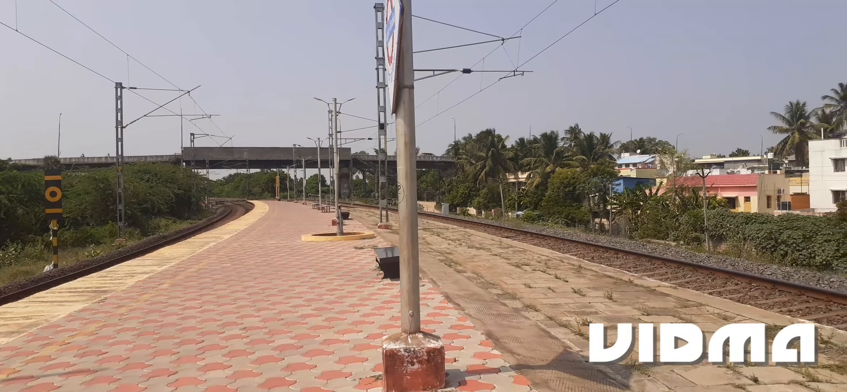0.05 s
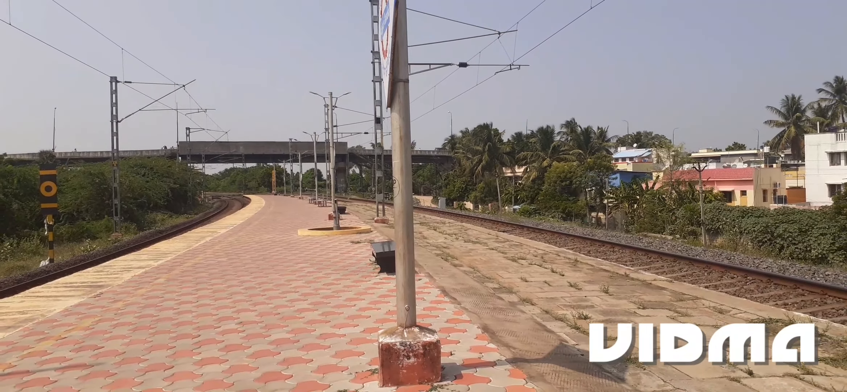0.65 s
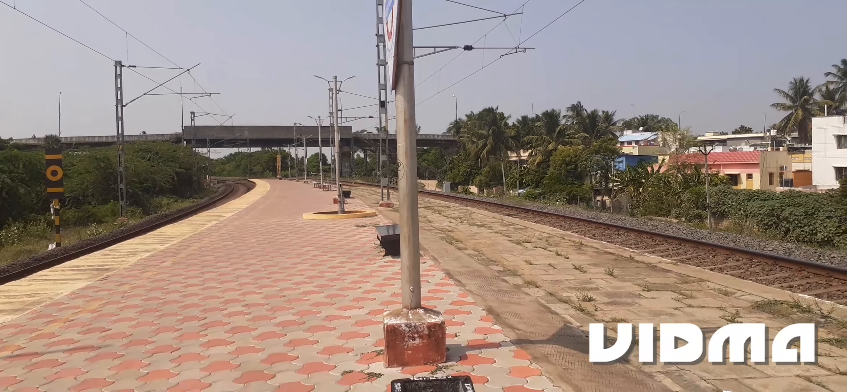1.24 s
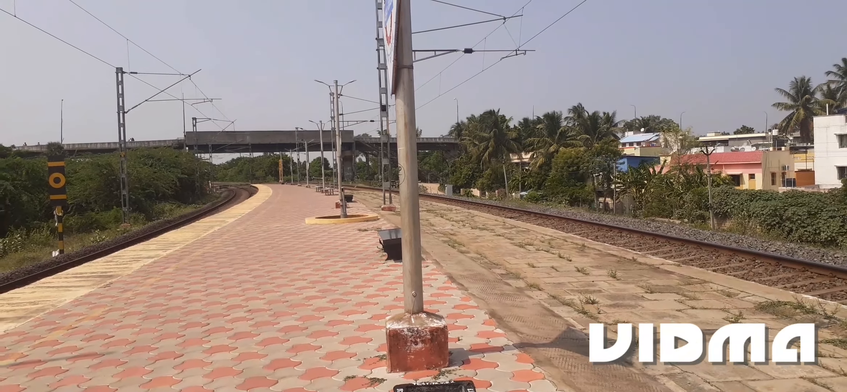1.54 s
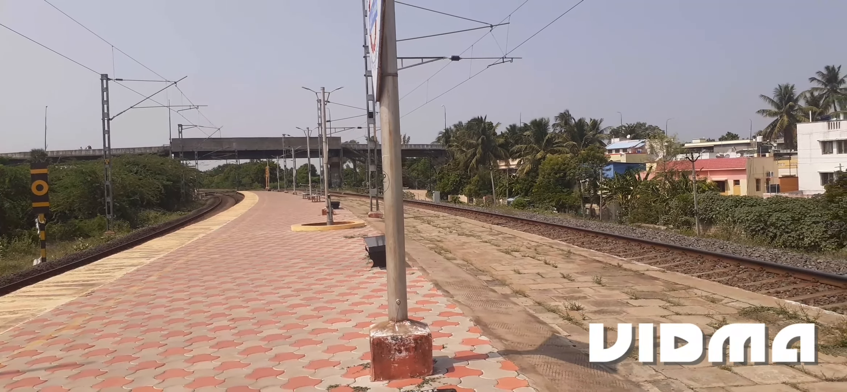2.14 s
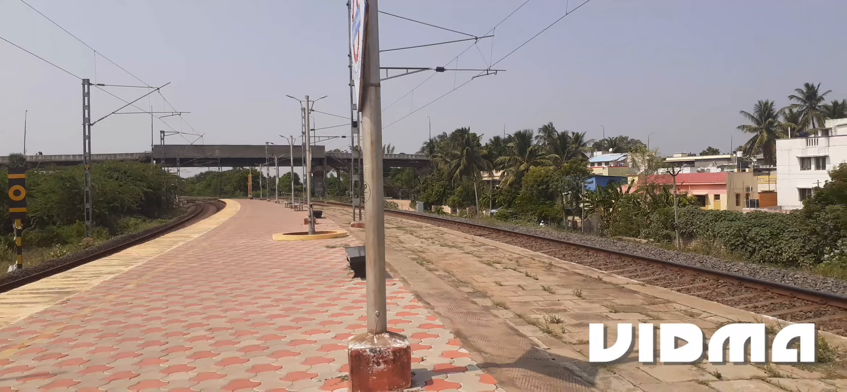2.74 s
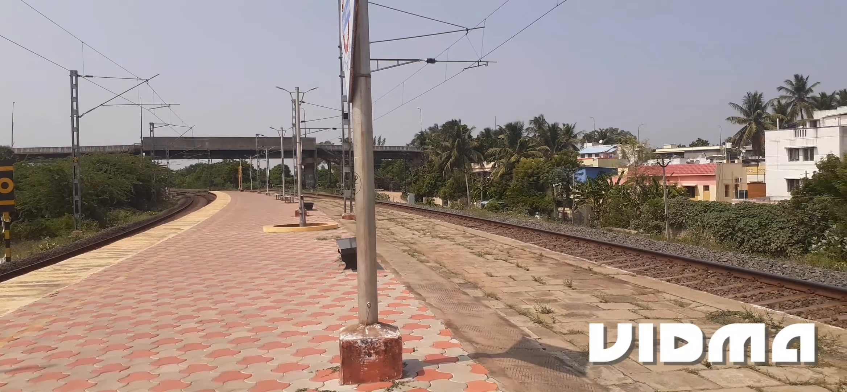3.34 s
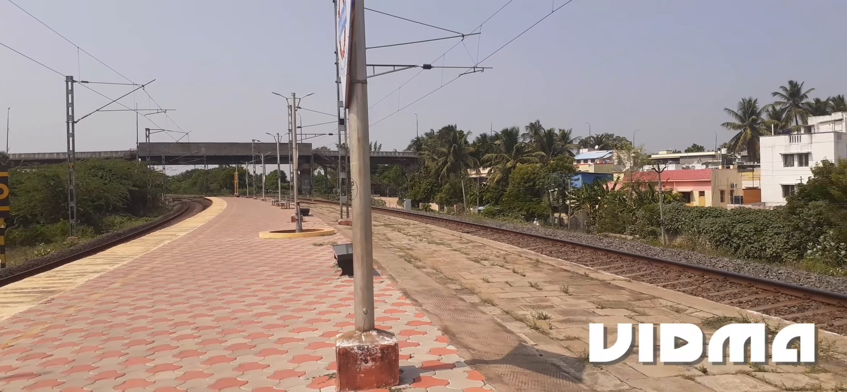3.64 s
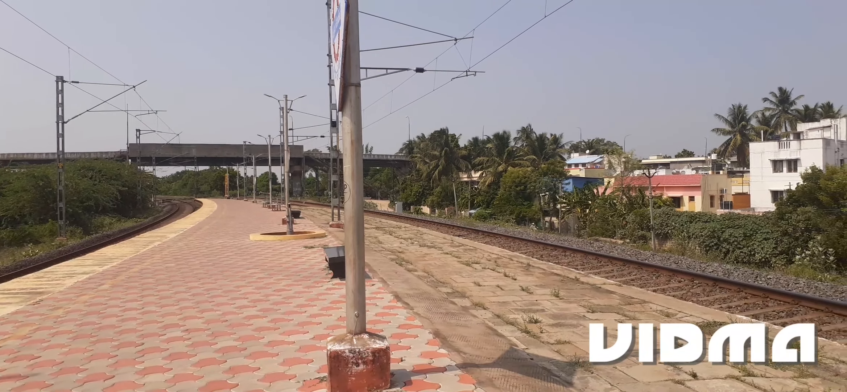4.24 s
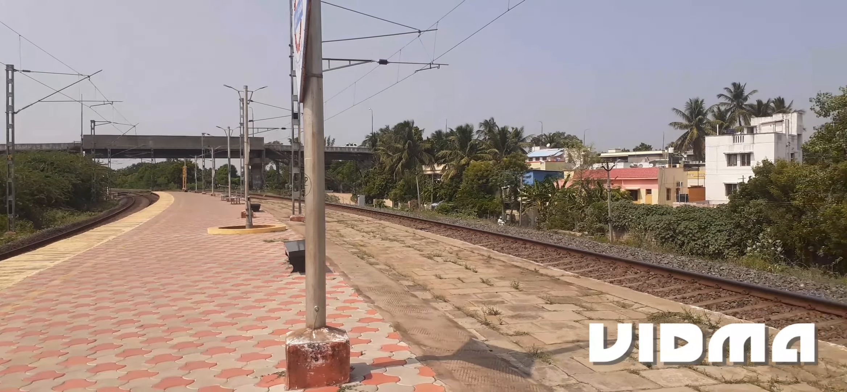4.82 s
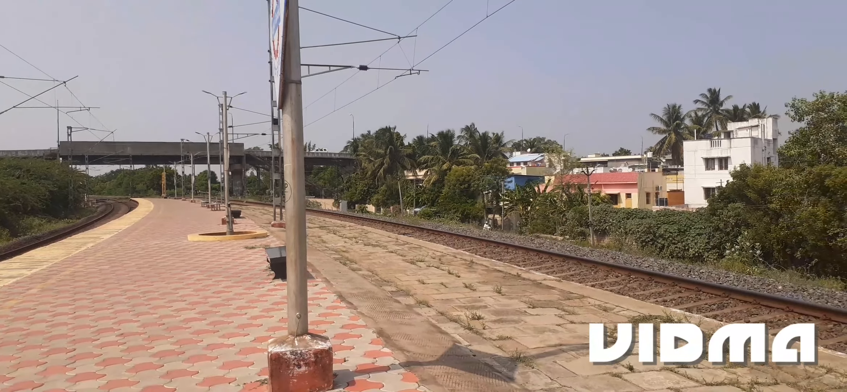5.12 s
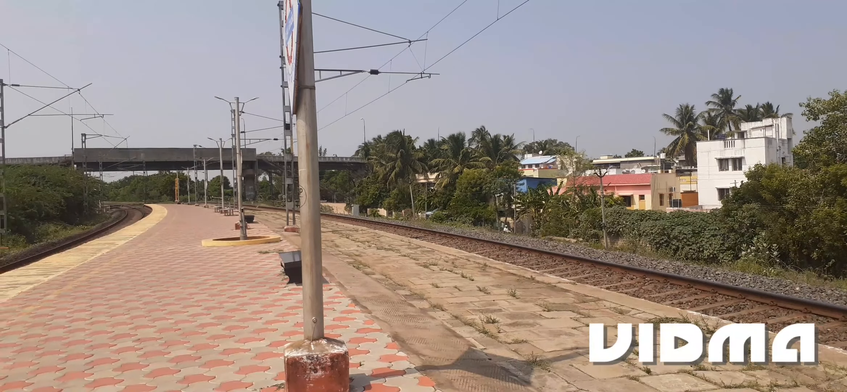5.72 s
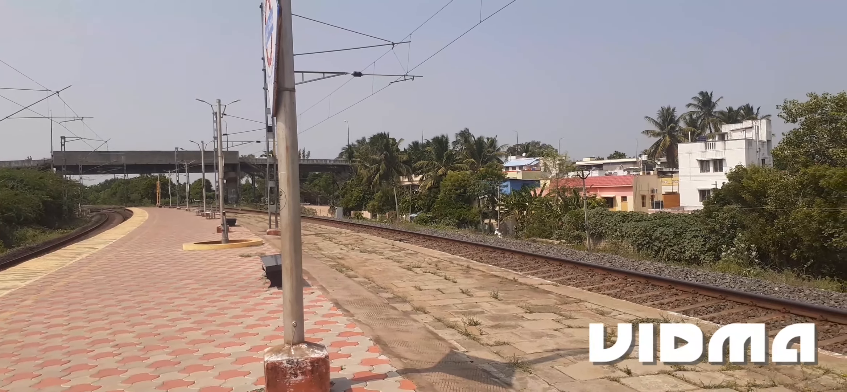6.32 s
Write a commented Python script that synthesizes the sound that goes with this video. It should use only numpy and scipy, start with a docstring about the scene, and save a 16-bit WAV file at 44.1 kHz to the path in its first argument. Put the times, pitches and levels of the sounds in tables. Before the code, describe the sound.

A far-off approaching train blows its air horn twice, each blast a little over a second long, wavering in the gusty air and echoing across an open platform. Between them comes a faint high whistle, while the train rolls and whines quietly. Wind thumps the microphone on the left and crackles on the right at first, eases, then buffets both sides during the second blast.

```python
"""Wind thumps the left microphone port and crackles on the right, on an open station platform.
A distant train sounds its air horn twice; gusty air makes the reed's partials fade in and out,
and a bridge, houses and trees throw the sound back. The train whines and the rails sing faintly
ahead of it. Far off, a hoot comes before the first blast, a whistle and one bird chirp after it.
Toward the end the wind turns and buffets both ports."""
import sys
import numpy as np
from scipy import signal
from scipy.fft import rfft, irfft, next_fast_len
from scipy.io import wavfile
from scipy.ndimage import map_coordinates

SR = 44100
rng = np.random.default_rng(int(sys.argv[2]) if len(sys.argv) > 2 else 0)


def to_wav(sig):
    """Store sig (one row per channel, or 1-D mono) as 16-bit WAV at the path in sys.argv[1].

    Samples outside -1..1 are clipped; the rate is SR.
    """
    pcm = np.clip(np.atleast_2d(sig), -1, 1) * 32767
    pcm = np.round(pcm).astype(np.int16)
    wavfile.write(sys.argv[1], SR, pcm.T)  # frames by channels


N = 280917
TIME = np.arange(N) / SR

# horn blasts: (start [s], valve closes [s], settled pitch [Hz], left port lead [ms], twinkle rate [1/s])
HORN_BLASTS = [(1.543, 2.762, 414.1, .17, 17.88), (5.199, 6.45, 413.2, 0.22, 16.95)]
# lowest two partials fading over the distance, per blast: (time [s], fundamental [dB], octave [dB])
LOW_FADES = [
    [(1.59, -35, -19.5), (2.022, -42, -28.5), (2.1, -38, -22.5), (2.284, -36.5, -22.5),
     (2.384, -42.5, -25.5), (2.592, -44.5, -26), (2.642, -69, -40.5), (2.678, -39, -30), (2.76, -38, -28.5)],
    [(5.26, -34, -21.5), (5.308, -40.5, -19), (5.372, -32.5, -21.5), (5.482, -31.5, -27), (5.73, -28, -26),
     (5.926, -28, -26), (6.102, -28, -29.5), (6.224, -29, -50), (6.294, -31, -33.5), (6.36, -31, -39.5)],
]
# the third partial, per blast: (time [s], level [dB])
THIRD_PARTIAL_FADES = [
    [(1.6, -27.5), (1.95, -29), (2.08, -31.5), (2.28, -30.5), (2.48, -38), (2.68, -29.5), (2.75, -36.5)],
    [(5.33, -30.5), (5.68, -30), (5.78, -41), (5.85, -35.5), (5.97, -42.5), (6.1, -33), (6.22, -29.5),
     (6.36, -33)],
]
# the fourth partial, then all higher ones together, per blast: (level [dB], drift [dB/s])
UPPER_LEVELS = [
    [(-37, -6.5), (-36, -2.5)],
    [(-35, 3.5), (-37, 1.5)],
]
# share of each higher partial in the first and second blast: (frequency [Hz], gain [dB])
FIRST_BRASS = [(2060, -5), (2480, -7.5), (2890, -12), (3300, -14.5), (3720, -16), (4540, -21), (5370, -23),
               (6200, -26), (6610, -35), (7850, -48), (11150, -69)]
SECOND_BRASS = [(2060, -3.5), (2480, -3), (2890, -12.5), (3300, -15.5), (3720, -9.5), (4540, -18.5),
                (4950, -19), (5370, -19.5), (5780, -20), (6200, -20), (6610, -27.5), (7850, -29.5),
                (9090, -42.5), (11150, -47)]
# the air briefly focuses or thins some overtones: (time [s], centre [Hz], half length [s], gain [dB])
AIR_SWELLS = [(1.641, 2440, 0.014, 14.5), (1.623, 4150, 0.029, 13.5), (2.03, 2070, 0.025, 9),
              (2.18, 2330, 0.11, 17.5), (5.399, 4490, 0.043, 21), (5.431, 1660, 0.032, -20.5),
              (5.943, 3028, 0.09, 22), (5.996, 4720, 0.16, 17), (6.305, 4200, 0.1, 7),
              (2.3, 3700, 0.046, 12), (2.367, 2070, 0.023, -15), (2.58, 2320, 0.043, -11),
              (5.665, 3720, 0.071, 7), (5.63, 7940, 0.067, 10), (6.135, 2070, 0.054, 8.5),
              (6.33, 2070, .07, -19)]
# the horn across the two ports: (frequency [Hz], left minus right [dB])
HORN_BALANCE = [(413, -.5), (826, -2), (1240, -6), (1650, -6.5), (2070, -12), (2900, -0.5), (11000, -13)]
# what bridge, houses and trees throw back: (frequency [Hz], gain [dB])
ECHO_SPECTRUM = [(410, 4), (820, -0.5), (1240, -3), (1650, 2), (2070, 6), (2480, 4.5), (3500, 2.5),
                 (6000, 6.5), (11000, -18.5)]
# partials of the weak lower horn: (frequency [Hz], gain [dB])
LOW_HORN_PARTIALS = [(718, 3), (1077, -0.5), (1436, -12.5), (2240, -22)]

# low buffeting at each port, as the wind turns from left to right: (time [s], level [dB])
LEFT_BUFFETING = [(0, -39), (.45, -42), (.68, -37), (.73, -45.5), (1.55, -46), (1.66, -57.5), (2.45, -59),
                  (2.55, -54), (3.3, -51.5), (3.8, -62), (4.12, -51), (4.35, -48), (4.42, -72), (5.2, -69),
                  (5.28, -49), (5.5, -44.5), (5.8, -38.5), (6.05, -47), (6.37, -44)]
RIGHT_BUFFETING = [(0, -67), (.75, -79), (2.3, -70), (3.099, -55), (3.25, -68), (3.42, -52.5),
                   (3.65, -48.5), (4.0, -52), (4.15, -44.5), (4.55, -43), (5.181, -52), (5.27, -42),
                   (5.8, -41), (6.05, -47.5), (6.37, -42.5)]
# crackly flutter at each port: (time [s], level [dB])
LEFT_FLUTTER = [(0, -58), (.8, -71.5), (4.2, -62.5), (4.3, -60), (4.42, -59), (5.15, -56.5), (5.25, -46),
                (5.7, -43.5), (5.95, -68), (6.37, -46)]
RIGHT_FLUTTER = [(0, -41), (.07, -46.5), (.14, -47.5), (.2, -43), (.27, -46), (.38, -43.5), (.64, -44.5),
                 (.72, -54), (.79, -52), (.82, -69), (1.21, -57), (1.25, -40), (1.3, -51), (1.33, -73),
                 (1.54, -51), (1.64, -37.5), (1.9, -50.5), (2.18, -41), (2.35, -61.5), (2.6, -45),
                 (2.68, -62), (3.15, -71), (3.23, -42), (3.31, -64), (5.2, -58.5), (5.769, -54.5),
                 (6.37, -59)]
# the strongest gust, churning at both ports: (time [s], level [dB])
GUST_LEVEL = [(5.1, -86), (5.25, -57), (5.5, -52.5), (5.7, -53), (5.78, -45), (5.85, -44.5), (6.05, -53.5),
              (6.37, -51.5)]
# spectra of the wind on the microphone: (frequency [Hz], density [dB])
BUFFET_SPECTRUM = [(15, -29), (30, -9), (55, 0), (85, 1), (140, -3), (240, -11), (400, -27.5), (900, -62.5)]
FLUTTER_SPECTRUM = [(90, -29), (230, -22.5), (300, 2), (380, 7.5), (540, -2.5), (850, -11.5), (1500, -25),
                    (3000, -43.5), (7000, -57)]
GUST_SPECTRUM = [(100, -27), (190, -5), (260, 1.5), (340, -0.5), (500, -21), (1000, -53.5)]
PUFF_SPECTRUM = [(120, -24), (230, -8), (320, 5), (480, 7.5), (800, -9.5), (1400, -13.5), (2500, -24.5),
                 (7000, -63)]
# big eddies that thump the ports: (time [s], level [dB], left minus right [dB], pitch [Hz])
BIG_EDDIES = [(.076, -28, 30, 111), (.234, -34, 23, 140), (.32, -27, 24, 130), (0.382, -22.5, 29, 100),
              (.436, -30, 25, 90), (.502, -28, 22, 190), (.512, -23, 8, 138), (0.581, -27.5, 22, 162),
              (.64, -28, 24, 135), (.96, -38, -9, 110), (1.014, -40, 28, 135), (1.123, -43.5, -6, 170),
              (1.258, -35, 20, 148), (1.435, -37, 2, 153), (1.532, -32, 26, 138), (2.586, -33.5, 20, 119),
              (3.729, -25.5, 6, 59.6), (3.902, -24, -2, 84), (4.148, -24, -3, 65), (4.227, -30, 0, 90),
              (4.316, -33.5, 19, 150), (4.83, -30, 1, 80.6), (5.243, -33.5, -12, 140),
              (5.474, -30, -1, 120), (5.529, -33, 7, 129), (5.611, -35, 4, 186), (5.73, -30.5, 3, 180),
              (5.776, -25.5, 2, 248), (5.926, -26, 0, 108), (6.186, -34, 6, 115), (6.274, -22.5, 5, 80)]
# small eddies that flick a port: (time [s], level [dB], left minus right [dB])
SMALL_EDDIES = [(.017, -45, -22), (.047, -43, -25), (.104, -43.5, -23), (.169, -41, -25), (.181, -44, -24),
                (.215, -39.5, -22), (.366, -39, -20), (.385, -43, -20), (0.465, -42.5, -18), (.503, -44, 1),
                (.58, -40.5, -18), (.598, -51, -20), (.652, -45, -20), (.78, -49, -20), (1.279, -44, -20),
                (1.644, -43, -18), (2.182, -37.5, -29), (2.58, -32, -28), (4.308, -46, -2),
                (5.25, -39.5, 11), (5.316, -42.5, 20), (5.614, -44, 10), (5.759, -39, -13), (6.29, -49, 12)]

# the train rolling in the distance: (time [s], level [dB])
ROLLING_LEVEL = [(0, -59), (.8, -59.5), (1.3, -55), (1.7, -52), (3.0, -55), (4.3, -63), (4.7, -61.5),
                 (5.15, -53.5), (6.37, -52)]
# its roar: (frequency [Hz], density [dB])
ROLLING_SPECTRUM = [(350, -5), (600, -5), (1000, -0.5), (1350, -3.5), (1700, -3), (2350, -7), (3100, -14.5),
                    (7000, -46)]
# its whine: (centre [Hz], width [Hz], gain [dB])
WHINE_PEAKS = [(1657, 70, 5.5), (1740, 80, -9.5)]
# the far whistle: (time [s], pitch [Hz], level [dB])
WHISTLE_COURSE = [(3.22, 3610, -85), (3.27, 3640, -73), (3.33, 3705, -61), (3.41, 3714, -51),
                  (3.5, 3714, -58.5), (3.56, 3714, -52.5), (3.65, 3714, -61), (3.72, 3714, -56.5),
                  (3.88, 3714, -57.5), (3.93, 3714, -58), (3.975, 3708, -48.5), (4.04, 3700, -60),
                  (4.11, 3630, -65), (4.16, 3610, -94)]
# rushing air around it: (centre [Hz], width [Hz], gain [dB])
WHISTLE_BAND = [(3640, 220, 0)]
# the far hoot: (time [s], level [dB])
HOOT_LEVEL = [(.95, -87), (1.08, -72), (1.18, -66), (1.28, -60), (1.34, -65), (1.39, -82)]
# its harmonics: (gain [dB], left minus right [dB])
HOOT_HARMONICS = [(-2, 20), (-8, -1), (0.5, -4)]
# a bird: (time [s], start pitch [Hz], end pitch [Hz], length [s], level [dB])
BIRD_CHIRP = (5.152, 2500, 1800, .035, -55)
# open-air hiss on the platform, which the rails follow: (time [s], level [dB])
HISS_LEVEL = [(0, -56), (.7, -57), (1.4, -56.5), (2.2, -58), (3.0, -60), (4.3, -59.5), (4.8, -60.5),
              (5.2, -59), (6.37, -58.5)]
# its colour: (frequency [Hz], density [dB])
HISS_SPECTRUM = [(40, -22), (150, -23.5), (500, 0.5), (1000, -11), (1400, -16), (2200, -7.5), (3000, -11.5),
                 (4200, -9), (4800, -10), (5600, -12), (7000, -12), (10000, -14), (11500, -20.5)]
# modes of the rails: (centre [Hz], width [Hz], gain [dB])
RAIL_PEAKS = [(2274, 140, -5), (3814, 110, -6), (4220, 110, -8.5), (4500, 140, -6), (5340, 200, -2.5),
              (5880, 160, -6.5), (6344, 130, -4), (7750, 80, -13.5), (8250, 100, -9.5), (8980, 90, -10)]
# how alike noise is at the two ports: (frequency [Hz], correlation [-1 to 1])
PORT_LIKENESS = [(60, 0.8), (170, 0.02), (480, 0.83), (1350, -0.48), (3830, 0.13), (10800, -0.13)]

SHARP_HZ, SETTLE_S, SAG_HZ_PER_S = 23.34, .085, 1.0  # the reed's pitch sags as the air pressure drops
ATTACK_S, BLOOM_S = 0.017, 0.0045  # each higher partial takes BLOOM_S longer to open
RELEASE_S, RING_S = 0.014, 0.098  # the fundamental rings on, higher partials far less
SWELL_WIDTH_HZ, SCATTER_HZ = 212, 2900  # turbulence takes over the partials above SCATTER_HZ
ECHO_FALL_DB_PER_S, ECHO_FLUTTER_DB, ECHO_FLUTTER_PER_S = 19, 9, 45
DOPPLER = .02  # an echo's largest drop in pitch, as a share


def train_horn(horn_db=-0.33, echo_db=-18, rasp_db=-18.5):
    """The air horn down the line: both blasts with their rasp and echoes."""
    settings = zip(HORN_BLASTS, LOW_FADES, THIRD_PARTIAL_FADES, UPPER_LEVELS, (FIRST_BRASS, SECOND_BRASS))
    blasts = [horn_blast(*parts) for parts in settings]
    answer = sum(echoes(sound, row[0]) for sound, row in zip(blasts, HORN_BLASTS))
    return amp(horn_db) * sum(blasts) + amp(rasp_db) * rasp(sum(blasts)) + amp(echo_db) * answer


def horn_blast(blast, fades, third, upper, brass, jitter=0.00061, waver_db=6.0, waver_rate=24):
    """The reed starts sharp and settles, and its buzz brightens as the pressure builds."""
    start, stop, settled_hz, lead_ms, twinkle_rate = blast
    span = (TIME > start) & (TIME < stop + np.pi * RING_S)
    t = TIME[span]
    age, after = t - start, np.maximum(t - stop, 0)
    pitch = settled_hz + SHARP_HZ * np.exp(-age / SETTLE_S) - SAG_HZ_PER_S * age
    phase = 2 * np.pi * np.cumsum(pitch * (1 + jitter * wobble(70, len(t)))) / SR
    *low_db, brass_db = curves(fades, t) + curves(third, t) + [db + drift * age for db, drift in upper]
    out = np.zeros((2, N))
    for k in range(1, 29):
        hz = k * settled_hz
        level_db = low_db[k - 1] if k <= len(low_db) else brass_db + along(brass, hz)
        swell_db = sum(db * np.exp(-((hz - centre) / SWELL_WIDTH_HZ) ** 2 - ((t - s) / half) ** 2)
                       for s, centre, half, db in AIR_SWELLS if abs(hz - centre) < 2 * SWELL_WIDTH_HZ)
        attack = 1 - np.exp(-(age / (ATTACK_S + k * BLOOM_S)) ** 2)
        release = np.exp(-(after / (RELEASE_S + RING_S / k ** 2)) ** 2)
        direct = pan(along(HORN_BALANCE, hz)) * left_lead(hz, lead_ms)
        # turbulence scatters short waves most: high partials twinkle, differently at each port
        share = (hz ** 2 / (hz ** 2 + SCATTER_HZ ** 2)) ** 2
        scattered = twinkle(twinkle_rate, len(t))
        waver = amp(waver_db * np.sqrt(share) * wobble(waver_rate, len(t)))
        arrival = unit(waver * (np.sqrt(1 - share) * direct + np.sqrt(share) * scattered))
        carrier = np.exp(1j * (k * phase + rng.uniform(0, 2 * np.pi)))
        out[:, span] += np.sqrt(2) * attack * release * amp(level_db + swell_db) * (arrival * carrier).real
    return out


def rasp(x, width_hz=70, corner_hz=2000):
    """Rushing air shakes the reed: a noisy skirt around each partial, strongest on the high ones."""
    shake = noise(lambda hz: 1 / np.sqrt(1 + (hz / width_hz) ** 2) / (1 + (hz / 500) ** 4))
    return shake * filtered(x, lambda hz: hz ** 2 / (hz ** 2 + corner_hz ** 2))


def echoes(x, start, count=36, spread_s=2.1, air_hz_s=1600):
    """Far reflectors answer later and weaker; beside the track, they hear the moving horn a little flat."""
    out = np.zeros((2, N))
    heard = np.flatnonzero(x[1])
    blast = x[1, heard[0]:heard[-1]]
    for i, (when, angle, side, lag) in enumerate(rng.random((count, 4))):
        delay = .03 + spread_s * (i + when) / count
        speed = 1 - DOPPLER * angle * min(1, 4 * delay)
        echo = np.interp(np.arange(0, len(blast) - 1, speed), np.arange(len(blast)), blast)
        # a longer path loses more treble to the air and flutters more in the wind
        pole = np.exp(-2 * np.pi * air_hz_s / delay / SR)
        echo = signal.lfilter([1 - pole], [1, -pole], echo)
        depth_db = ECHO_FLUTTER_DB * delay / (delay + .1)
        flutter = unit(amp(depth_db * wobble(ECHO_FLUTTER_PER_S, len(echo))))
        echo *= amp(-ECHO_FALL_DB_PER_S * delay) * flutter
        for port, gain in enumerate(pan(12 * (side - .5))):
            at = round((start + delay + (port - .5) * (lag - .5) * .0012) * SR)
            out[port, at:at + len(echo)] += gain * echo[:max(N - at, 0)]
    return filtered(out, lambda hz: amp(along(ECHO_SPECTRUM, hz)))


def low_horn(level_db=-59.5, swell_s=0.54, outlast_s=0.089, release_s=0.17, waver_db=3, drift=0.0054):
    """A second, lower horn barely speaks: it swells late in each blast and outlasts the main one."""
    clock = np.cumsum(1 + drift * wobble(13)) / SR
    tone = sum(amp(db + waver_db * wobble(13)) * np.sin(2 * np.pi * hz * clock)
               for hz, db in LOW_HORN_PARTIALS)
    envelope = np.zeros(N)
    for start, stop, *_ in HORN_BLASTS:
        swell = 1 - np.exp(-(np.maximum(TIME - start, 0) / swell_s) ** 2)
        envelope += swell * np.exp(-np.maximum(TIME - stop - outlast_s, 0) / release_s)
    return np.sqrt(2) * amp(level_db) * envelope * tone * pan(-2)


def wind(lumps_db=2.5, crackle_db=3.5):
    """Eddies right at the microphone: big ones buffet, small ones crackle, and the last gust churns."""
    def layer(levels, spectrum, depth_db, rate):
        eddies = amp(depth_db * np.clip([wobble(rate), wobble(rate)], -2, 2))
        return amp([curves(rows)[0] for rows in levels]) * unit(eddies * coloured(spectrum))
    buffeting = layer((LEFT_BUFFETING, RIGHT_BUFFETING), BUFFET_SPECTRUM, lumps_db, rate=35)
    flutter = layer((LEFT_FLUTTER, RIGHT_FLUTTER), FLUTTER_SPECTRUM, crackle_db, rate=75)
    churn = layer([GUST_LEVEL], GUST_SPECTRUM, lumps_db, rate=50)
    return buffeting + flutter + churn


def thumps(push_s=0.0026, puff_s=0.0031, push_db=-1, puff_db=4):
    """Single eddies hit the ports: a big one gives a low push, a small one a short crackly puff."""
    out = np.zeros((2, N + SR))
    t = np.arange(SR // 10) / SR
    swell = lambda peak_s: t / peak_s * np.exp(1 - t / peak_s)
    for s, db, side_db, hz in BIG_EDDIES:
        phase = 2 * np.pi * hz * t + rng.uniform(0, 2 * np.pi) + rng.normal(0, 1.0, (2, 1))
        push = swell(push_s) * np.sin(phase)
        out[:, round(s * SR):][:, :len(t)] += pan(side_db) * amp(db + push_db) * push
    for s, db, side_db in SMALL_EDDIES:
        puff = swell(puff_s) * coloured(PUFF_SPECTRUM, len(t))
        out[:, round(s * SR):][:, :len(t)] += pan(side_db) * amp(db + puff_db) * puff
    return out[:, :N]


def whine(over_rolling_db=-3.5, lead_ms=0.24, waver_db=3.0):
    """The approaching train's narrow whine follows its rolling noise and reaches the left port first."""
    response = lambda hz: resonances(WHINE_PEAKS)(hz) * left_lead(hz, lead_ms)
    tone = unit(filtered(rng.standard_normal(N), response))
    return amp(curves(ROLLING_LEVEL)[0] + over_rolling_db + waver_db * wobble(11)) * tone * pan(-0.18)


def whistle(upper_hz=4122, upper_db=-13, fuzz_db=3, fuzz_rate=85, airy_db=-9):
    """A thin two-tone whistle far off, roughened by its airflow: the main tone lifts, holds and droops."""
    blown = (TIME > WHISTLE_COURSE[0][0]) & (TIME < WHISTLE_COURSE[-1][0])
    pitch, level_db = curves(WHISTLE_COURSE, TIME[blown])
    size = len(pitch)
    def tone(hz):
        roughness = 1 + amp(fuzz_db) * twinkle(fuzz_rate, size)
        return unit((roughness * np.exp(2j * np.pi * np.cumsum(hz) / SR)).real)
    airy = noise(resonances(WHISTLE_BAND), size)
    tones = tone(pitch) + amp(upper_db) * tone(np.full(size, upper_hz))
    out = np.zeros((2, N))
    out[:, blown] = amp(level_db) * (tones + amp(airy_db) * airy)
    return out


def hoot(pitch_hz=765, waver_db=1.0, drift=0.0059):
    """A faint pitched hoot, perhaps a horn on a far road."""
    phase = 2 * np.pi * np.cumsum(pitch_hz * (1 + drift * wobble(39.5))) / SR
    tone = sum(pan(side) * amp(db + waver_db * wobble(27.2)) * np.sin(k * phase)
               for k, (db, side) in enumerate(HOOT_HARMONICS, 1))
    sounding = (TIME > HOOT_LEVEL[0][0]) * (TIME < HOOT_LEVEL[-1][0])
    return np.sqrt(2) * sounding * amp(curves(HOOT_LEVEL)[0]) * tone


def bird():
    """One short falling chirp, dead centre."""
    start, high_hz, low_hz, length, db = BIRD_CHIRP
    progress = np.clip((TIME - start) / length, 0, 1)
    phase = 2 * np.pi * np.cumsum(high_hz + (low_hz - high_hz) * progress) / SR
    return amp(db) * np.sin(np.pi * progress) ** 2 * np.sin(phase)


def platform_ambience(sway_db=.4, rail_db=-63, rail_swing=2.02, shimmer_db=2.2):
    """Open-air hiss, the train's far roar, and the rails singing in their narrow modes."""
    hiss_db, = curves(HISS_LEVEL)
    air = amp(hiss_db + sway_db * wobble(2.3)) * coloured(HISS_SPECTRUM)
    roar = amp(curves(ROLLING_LEVEL)[0]) * coloured(ROLLING_SPECTRUM)
    singing_db = rail_db + rail_swing * (hiss_db - hiss_db.mean()) + shimmer_db * wobble(21)
    rails = amp(singing_db) * noise(resonances(RAIL_PEAKS))
    return (air + rails) * pan(0.79) + roar * pan(-0.71)


def amp(db):
    """Decibels to gain."""
    return 10 ** (np.asarray(db) / 20)


def unit(x):
    """Scale to rms 1."""
    return x / np.sqrt(np.mean(np.abs(x) ** 2) + 1e-20)


def along(points, hz):
    """(frequency [Hz], value) points read on a log axis."""
    freqs, values = np.transpose(points)
    return np.interp(np.log(hz + 1), np.log(freqs + 1), values)


def curves(rows, t=TIME):
    """One value per sample for each column after the time."""
    times, *columns = np.transpose(rows)
    return [np.interp(t, times, column) for column in columns]


def wobble(rate, size=N):
    """A smooth random curve with rate knots a second."""
    coarse = np.arange(0, size + 64, 64)
    knots = rng.standard_normal(1024)
    return np.interp(np.arange(size), coarse, map_coordinates(knots, [coarse * rate / SR], mode="wrap"))


def twinkle(rate, size):
    """A gain that wanders in level and phase, separately at each port."""
    return unit(np.array([wobble(rate, size) + 1j * wobble(rate, size) for port in range(2)]))


def pan(db):
    """Left and right gains of constant power for a level difference."""
    gains = amp(np.array([np.atleast_1d(db), -np.atleast_1d(db)]) / 2)
    return gains / np.sqrt(np.mean(gains ** 2, axis=0))


def left_lead(hz, ms):
    """Phase at each port for an off-axis source that reaches the left one earlier."""
    return np.exp(1j * np.pi * hz * ms / 1000 * np.array([[1], [-1]]))


def filtered(x, response):
    """x shaped by a response of frequency."""
    size = x.shape[-1]
    padded = next_fast_len(size + 8192, True)
    return irfft(rfft(x, padded) * response(np.fft.rfftfreq(padded, 1 / SR)), padded)[..., :size]


def noise(response, size=N):
    """Shaped stereo noise of rms 1, partly alike at the two ports."""
    def mid_side(hz):
        angle = np.arccos(np.clip(along(PORT_LIKENESS, hz), -1, 1)) / 2
        return response(hz) * [np.cos(angle), np.sin(angle)]
    mid, side = filtered(rng.standard_normal((2, size)), mid_side)
    return unit(np.array([mid + side, mid - side]))


def coloured(spectrum, size=N):
    """Stereo noise that follows a spectrum table."""
    return noise(lambda hz: amp(along(spectrum, hz)), size)


def resonances(modes):
    """Response of a set of steep-sided peaks."""
    return lambda hz: sum(amp(db) / (1 + (2 * (hz - centre) / width) ** 2) for centre, width, db in modes)


def scene():
    """Everything that reaches the microphone on the platform."""
    train = train_horn() + low_horn() + whine()
    return train + whistle() + hoot() + bird() + wind() + thumps() + platform_ambience()


def record(dry, low_cut_hz=39, top_hz=11600):
    """The microphone thins the deepest bass, and the recorder keeps nothing above its band limit."""
    thinned = filtered(dry, lambda hz: (1j * hz / (low_cut_hz + 1j * hz)) ** 2)
    return filtered(thinned, lambda hz: 1 / (1 + (hz / top_hz) ** 160))


dry = scene()
out = record(dry)
to_wav(out)
```